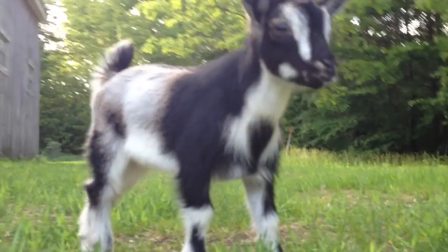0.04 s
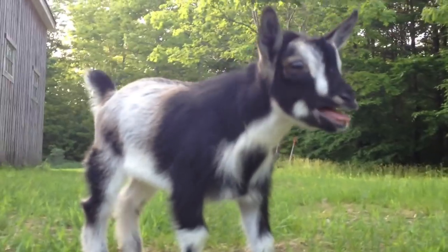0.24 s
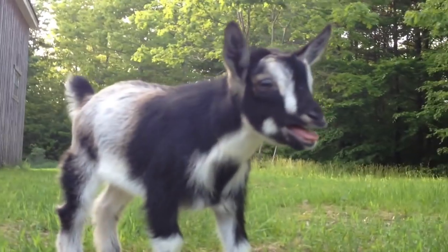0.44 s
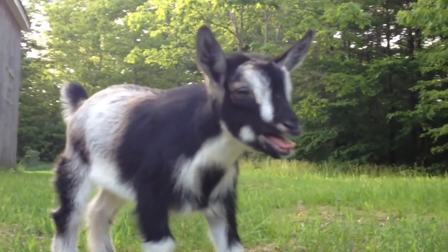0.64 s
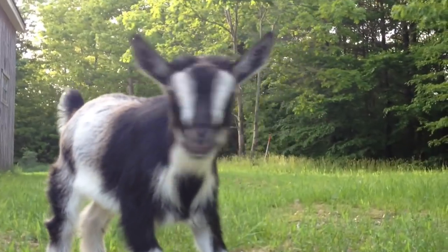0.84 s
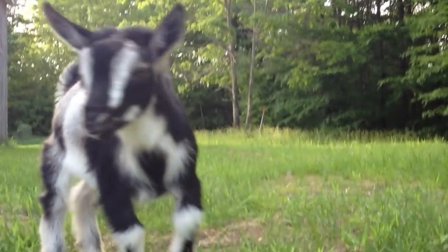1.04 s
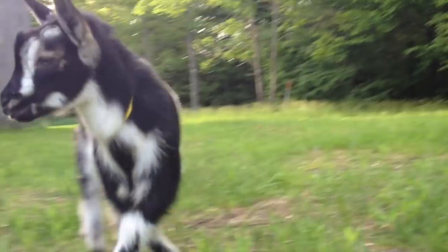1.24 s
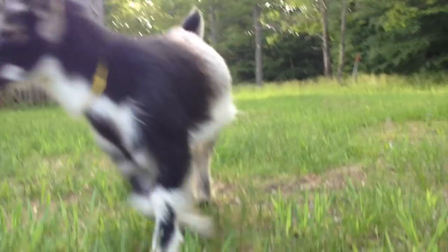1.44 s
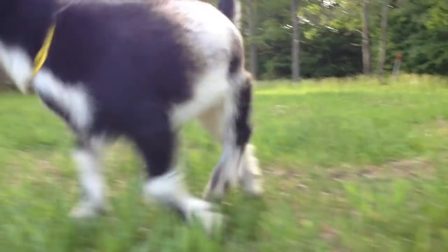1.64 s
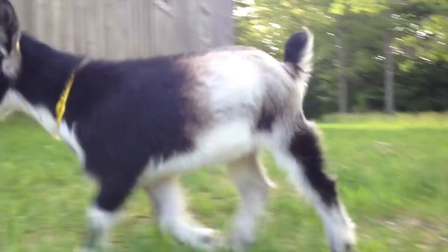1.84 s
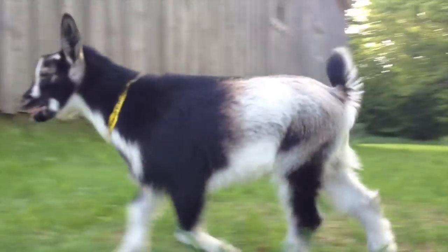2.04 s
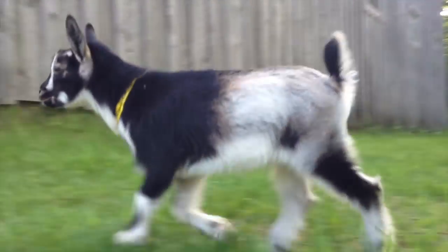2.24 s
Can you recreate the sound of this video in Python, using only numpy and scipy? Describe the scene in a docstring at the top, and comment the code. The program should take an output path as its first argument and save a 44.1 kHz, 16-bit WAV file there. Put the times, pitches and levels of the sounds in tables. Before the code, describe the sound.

A young goat bleats close to the microphone in a high, quavering voice, then bleats again more briefly, turned away. Soft hoof thuds on grass and a faint outdoor murmur lie underneath.

```python
"""Over a quiet outdoor murmur, a goat kid on a lawn bleats towards the listener. A squeak opens the
bleat, then its vocal folds drive the throat in throbs, about eleven a second: the voice slides up
hoarsely, locks on a clear note, breaks and falls. A breathy grunt closes it. Soft low thuds lie
underneath and go on in the pause. At 1.6 s the kid bleats again, more briefly, turned away as it
trots off, and a few last thuds follow."""
import sys
import numpy as np
from scipy import signal
from scipy.fft import rfft, irfft, next_fast_len
from scipy.io import wavfile
from scipy.ndimage import uniform_filter1d

SR = 44100
rng = np.random.default_rng(int(sys.argv[2]) if len(sys.argv) > 2 else 0)


def wrap_up_sound(samples):
    """Save the sound to the file named by the first command line argument, as 16-bit audio."""
    columns = np.atleast_2d(samples).T
    # keep every value between -1 and 1, then stretch to whole-number steps
    tamed = np.clip(columns, -1, 1)
    steps = np.round(tamed * 32767).astype(np.int16)
    wavfile.write(sys.argv[1], SR, steps)


N = 101429
TIME = np.arange(N) / SR

# The two bleats, facing and then turned away: start_s, end_s
BLEAT_SPANS = [(.134, .762), (1.608, 2.04)]
# Throat response to the hoarse voice: frequency_hz, facing_db, turned_away_db
HOARSE_RESPONSE = [(250, -85.5, -70.5), (614, -58.5, -52.5), (912, -56.5, -62.5), (1254, -44.5, -64.5),
                   (1375, -45, -54), (1658, -29, -34), (1877, -39.5, -45.5), (2320, -47.5, -54.5),
                   (2620, -55, -53), (3070, -45, -57.5), (3040, -63, -73.5), (4100, -41.5, -46.5),
                   (4350, -60, -51), (4820, -49.5, -51.5), (7080, -51.5, -57.5), (8320, -69.5, -90),
                   (15000, -79.5, -82.5)]

BLEAT_EDGE_S, HOARSE_DB, CUTOFF_HZ = 0.0076, -5, 15250
JITTER_RATE_HZ = 261  # how fast the pitch flutters
SHIMMER_DB, SHIMMER_RATE_HZ = 1.8, 130  # how far and how fast the level flutters


def from_db(db):
    """Amplitude ratio of a level in decibels."""
    return 10 ** (np.asarray(db) / 20)


def unit_power(x):
    """Normalisation to a mean square of one."""
    return x / np.sqrt(np.mean(x ** 2) + 1e-20)


def drift(rate_hz):
    """Random fluctuation of unit power: low-passed noise, drawn at every 20th sample."""
    pole = np.exp(-2 * np.pi * rate_hz * 20 / SR)
    white = rng.standard_normal((N + SR) // 20)
    slow = signal.lfilter([1], [1, -2 * pole, pole * pole], white)[SR // 20:]
    return np.interp(np.arange(N) / 20, np.arange(len(slow)), unit_power(slow))


def colour(x, points):
    """Minimum-phase filtering through (frequency_hz, gain_db) points; a folded cepstrum is causal."""
    size = 2 * next_fast_len(N)
    hz, db = np.transpose(points)
    grid_hz = np.maximum(np.arange(size // 2 + 1) * SR / size, 1)
    gain = from_db(np.interp(np.log(grid_hz), np.log(hz), db))
    cepstrum = irfft(np.log(gain))
    cepstrum[1:size // 2] *= 2
    cepstrum[size // 2 + 1:] = 0
    return irfft(rfft(x, size) * np.exp(rfft(cepstrum)))[:N]


def noise(points):
    """Spectral shaping of white noise, at unit power."""
    return unit_power(colour(rng.standard_normal(N), points))


def onset(centre_s, attack_s):
    """Smooth step from 0 to 1."""
    return .5 + .5 * np.tanh((TIME - centre_s) / attack_s)


def open_air():
    """Broadband ambient noise: a steady faint hiss above a low murmur that swells and ebbs."""
    # Spectrum of the air: frequency_hz, relative_density_db
    spectrum = [(15, -73.5), (25, -51.5), (95, -14.5), (135, -5), (224, -2.5), (354, -10.5), (543, -11),
                (811, -17), (1150, -19.5), (1540, -21), (1810, -23), (2020, -25), (2240, -24.5),
                (10300, -37.5), (15000, -31)]
    # Swell of the murmur: time_s, gain_db
    swell = [(0, 3.5), (.3, -0.5), (.9, -1), (1.2, 2), (1.5, -3), (1.9, 1.5), (2.3, 1.5)]
    air = from_db(-68) * noise(spectrum)
    murmur = signal.sosfiltfilt(signal.butter(2, 1500, fs=SR, output="sos"), air)
    hiss = air - murmur
    return hiss + murmur * from_db(np.interp(TIME, *np.transpose(swell)))


def thuds(attack_s=0.011):
    """Damped impacts, like steps on turf: bursts of low noise that decay exponentially."""
    # Impacts: time_s, level_db, decay_s
    impacts = [(.365, -59, 0.029), (0.39, -55, 0.046), (0.488, -62.5, 0.027), (0.604, -57.5, 0.057),
               (.655, -62.5, 0.073), (1.097, -57, 0.051), (1.153, -59.5, 0.033), (1.253, -60, 0.027),
               (2.03, -63.5, 0.043), (2.12, -62.5, .02), (2.25, -61, .08)]
    # Spectrum of a thud: frequency_hz, relative_db
    spectrum = [(30, -38.5), (80, -17), (130, -0.5), (200, 3), (280, -11), (400, -24.5), (1000, -37),
                (4000, -57)]
    envelope = 0
    for time_s, level_db, decay_s in impacts:
        age = np.maximum(TIME - time_s, 0)
        envelope += from_db(level_db) * onset(time_s - attack_s, attack_s) * np.exp(-age / decay_s)
    return envelope * noise(spectrum)


def tree_echo(x, level_db=-35, t60_s=0.72, delay_s=.02):
    """Scattering from the trees and the fence returns a faint, exponentially decaying tail."""
    tail = rng.standard_normal(N) * from_db(-60 * TIME / t60_s) * (TIME > delay_s)
    return from_db(level_db) * signal.fftconvolve(x, tail / np.sqrt(np.sum(tail ** 2)))[:N]


def grunts(attack_s=0.0059, decay_db_per_s=427, chest_extra_db_per_s=113):
    """The last air of each bleat leaves as a puff of noise with a damped, wavering chest resonance."""
    # Closing grunts: time_s, puff_db, chest_db
    exhalations = [(0.759, -44.5, -58), (2.019, -50, -45.5)]
    # Spectrum of the puff: frequency_hz, relative_db
    spectrum = [(50, -53), (250, -35.5), (450, 1), (700, -7), (1450, -8), (2000, 1.5), (2500, -19.5),
                (3030, -7), (3400, -18.5), (5000, -16.5), (7000, -26.5), (9000, -37.5), (14000, -46)]
    puff = noise(spectrum)
    chest_hz = 444 + 55 * drift(JITTER_RATE_HZ)
    chest = np.sqrt(2) * np.sin(2 * np.pi * np.cumsum(chest_hz) / SR)
    chest *= from_db(SHIMMER_DB * drift(SHIMMER_RATE_HZ))
    out = 0
    for time_s, puff_db, chest_db in exhalations:
        age = np.maximum(TIME - time_s, 0)
        envelope = onset(time_s - attack_s, attack_s) * from_db(-decay_db_per_s * age)
        chest_gain = from_db(chest_db - chest_extra_db_per_s * age)
        out += envelope * (from_db(puff_db) * puff + chest_gain * chest)
    return out


def vocal_folds(pitch_hz, wander_db=3, wander_rad=0.47, wander_rate_hz=7.9):
    """Glottal source: harmonics near unit power, and equally strong air noise pulsed once a cycle."""
    phase = 2 * np.pi * np.cumsum(pitch_hz) / SR
    folds = 0
    for k in np.arange(1, 33):
        looseness = min(k / 10, 1)  # higher harmonics wander more in level and phase
        gain = from_db(looseness * wander_db * drift(wander_rate_hz)) * (k * pitch_hz < CUTOFF_HZ)
        phase_shift = looseness * wander_rad * drift(wander_rate_hz)
        folds -= np.sqrt(2) * gain * np.cos(k * phase + phase_shift)
    air = unit_power((1 + np.cos(phase)) * rng.standard_normal(N))
    return folds, air * np.sqrt(SR / 2 / pitch_hz)


def throat(source, response, bleat):
    """Formant filtering, as heard with the kid facing (bleat 0) or turned away (bleat 1)."""
    return colour(source, np.array(response)[:, [0, bleat + 1]])


def squeaks(fall_s=0.0088, top_hz=4200):
    """A falling glide of the vocal folds under a Gaussian envelope opens each bleat with a squeak."""
    # Opening squeaks: peak_s, rise_s, pitch_hz, glide_hz_per_s, relative_db, air_ratio, jitter_ratio
    openings = [(.165, .026, 397.4, -1800, -13, 0.07, 0.022), (1.640, .042, 410.2, -2400, -4, 0.4, 0.038)]
    lowpass = signal.butter(1, top_hz, fs=SR, output="sos")
    out = 0
    for bleat, (peak_s, rise_s, hz, glide, db, air_ratio, jitter) in enumerate(openings):
        offset_s = TIME - peak_s
        pitch_hz = hz + glide * np.clip(offset_s, -2 * rise_s, 2 * fall_s)
        folds, air = vocal_folds(pitch_hz * (1 + jitter * drift(JITTER_RATE_HZ)))
        gate = onset(BLEAT_SPANS[bleat][0], BLEAT_EDGE_S)
        envelope = np.exp(-(offset_s / np.where(offset_s < 0, rise_s, fall_s)) ** 2)
        source = gate * from_db(HOARSE_DB + db) * envelope * (folds + air_ratio * air)
        out += throat(signal.sosfilt(lowpass, source), HOARSE_RESPONSE, bleat)
    return out


def throbs():
    """Frequency and amplitude modulation: the nearest throb sets the pitch, lock and three gains."""
    # Held note of each throb: start_s, length_s, pitch_hz, glide_hz_per_s, relative_db, clearness_ratio
    notes = [(0.231, .019, 606.4, -2.5, -2, 0.99), (0.32, .022, 598, 28, -0.7, 1),
             (.420, 0.017, 599.3, -100, -1.3, 0.96), (0.502, 0.028, 609, -100, -0.9, 0.93),
             (0.598, 0.031, 615.4, 3, -0.45, 0.75), (0.692, 0.034, 617.4, -200, -1, 0.91),
             (0.748, .008, 470, -5, -8.5, 0), (1.689, 0.03, 574.8, -450, 0.5, 0.95),
             (1.777, 0.031, 590.2, -100, -1, 0.99), (1.879, 0.026, 607.5, -200, -0.5, 0.78),
             (1.972, 0.024, 597.7, -700, -2.5, 0.92)]
    rise_s, fall_s, lock_s = .031, .020, 0.0022
    bend_hz, overshoot_hz, overshoot_s, sag_hz_per_s, lowest_hz = 7, 46.36, .007, 8500, 390
    clear_db, swell_db, arch_db, break_db = -3.5, 0.35, 4, -1
    hoarse_fade_db, hoarse_floor_db, treble_fade_db, treble_floor_db = 28, -30, 16.5, -37.5

    start_s, length_s, hz, glide, db, clearness = np.array(notes).T[:, :, None]
    offset_s = TIME - start_s - length_s / 2
    outside_s = np.maximum(abs(offset_s) - length_s / 2, 0)
    distance = outside_s / np.where(offset_s < 0, rise_s, fall_s)
    nearest = np.argmin(distance, axis=0)
    offset_s, outside_s, distance = [c[nearest, np.arange(N)] for c in (offset_s, outside_s, distance)]
    length_s, hz, glide, db, clearness = [c[nearest, 0] for c in (length_s, hz, glide, db, clearness)]

    # The note curls upward at both ends; outside it the pitch overshoots, then sags.
    along = np.clip(2 * offset_s / length_s, -1, 1)
    note_hz = hz + glide * along * length_s / 2 + bend_hz * along ** 4
    overshoot = overshoot_hz * np.minimum(outside_s / overshoot_s, 1)
    sag = sag_hz_per_s * np.maximum(outside_s - overshoot_s, 0)
    pitch_hz = np.maximum(note_hz + overshoot - sag, lowest_hz)

    # Lock runs from 0 (hoarse) to 1 (clear).
    lock = clearness * (.5 + .5 * np.tanh((length_s / 2 - abs(offset_s)) / lock_s))
    clear = from_db(clear_db + db + swell_db * along + arch_db * (.5 - along ** 2))
    slide = from_db(HOARSE_DB + db + break_db * (offset_s > 0))
    hoarse = slide * (from_db(-hoarse_fade_db * distance ** 3.02) + from_db(hoarse_floor_db))
    treble = slide * (from_db(-treble_fade_db * distance) + from_db(treble_floor_db))
    return [uniform_filter1d(c, size=64) for c in (pitch_hz, lock, clear, hoarse, treble)]


def bleats(clear_jitter=0.00222, hoarse_jitter=.028, crossover_hz=2800):
    """Source and filter: steady pulses on the notes, jittered pulses and air between, drive the throat."""
    # Throat response to the clear note: frequency_hz, facing_db, turned_away_db
    clear_response = [(310, -77.5, -68), (576, -51.5, -45.5), (900, -50, -62), (1225, -38, -59.5),
                      (1728, -33, -34), (1940, -31, -43), (2470, -49, -52), (2910, -46.5, -51),
                      (3320, -44.5, -63.5), (3740, -45.5, -55.5), (3971, -45, -49), (5400, -45.5, -45.5),
                      (5686, -47.5, -53), (6700, -46.5, -56), (7340, -60, -60), (8310, -70, -105),
                      (10800, -76, -82.5), (15046, -76.5, -89)]
    pitch_hz, lock, clear_gain, hoarse_gain, treble_gain = throbs()
    jitter = (clear_jitter + hoarse_jitter * (1 - lock)) * drift(JITTER_RATE_HZ)
    wobble = 0.00383 * drift(rate_hz=44.1)
    folds, air = vocal_folds(pitch_hz * (1 + jitter + wobble))
    lowpass = signal.butter(2, crossover_hz, fs=SR, output="sos")
    low_folds, low_air = signal.sosfiltfilt(lowpass, [folds, air])
    low = from_db(1.5 + SHIMMER_DB * drift(SHIMMER_RATE_HZ)) * low_folds + from_db(-3) * low_air
    high = from_db(-0.5) * (folds - low_folds) + from_db(-4) * (air - low_air)
    breath = lock * hoarse_gain * from_db(-22) * air
    rasp = (1 - lock) * (hoarse_gain * low + treble_gain * high) + breath
    out = 0
    for bleat, (start_s, end_s) in enumerate(BLEAT_SPANS):
        gate = onset(start_s, BLEAT_EDGE_S) * (1 - onset(end_s, BLEAT_EDGE_S))
        out += throat(gate * lock * clear_gain * folds, clear_response, bleat)
        out += throat(gate * rasp, HOARSE_RESPONSE, bleat)
    return out


def scene():
    """Superposition of the kid, its echo, the thuds and the open air in one channel."""
    kid = squeaks() + bleats() + grunts()
    return (kid + tree_echo(kid) + thuds() + open_air())[None]


def record(dry):
    """Band limiting: an elliptic low-pass cuts the highest treble steeply."""
    return signal.sosfilt(signal.ellip(12, .1, 70, CUTOFF_HZ, fs=SR, output="sos"), dry)


dry = scene()
out = record(dry)
wrap_up_sound(out)
```